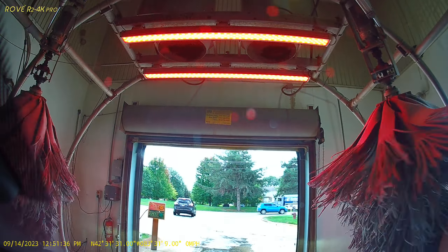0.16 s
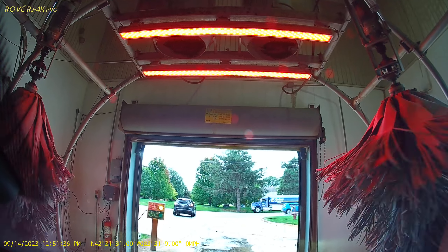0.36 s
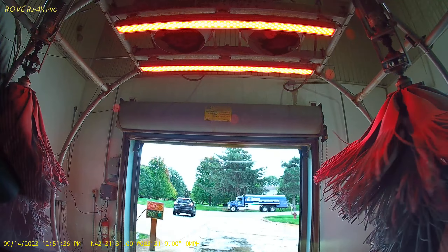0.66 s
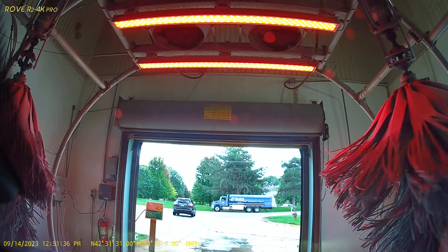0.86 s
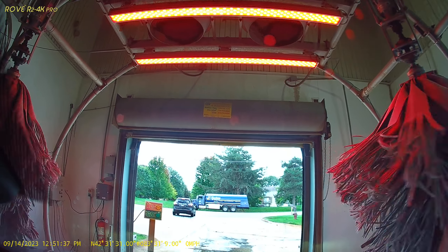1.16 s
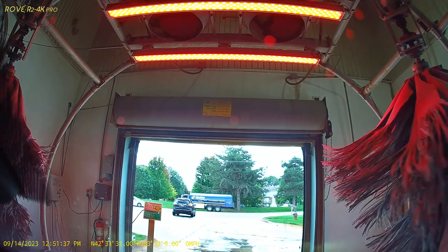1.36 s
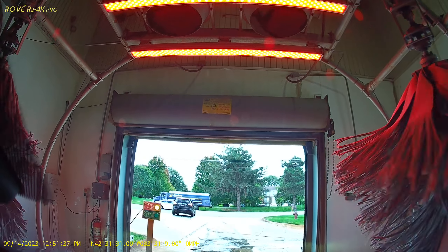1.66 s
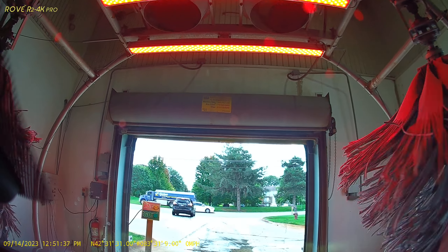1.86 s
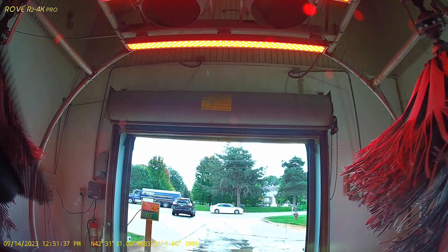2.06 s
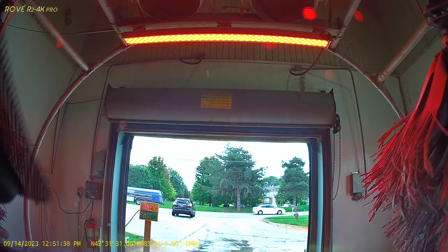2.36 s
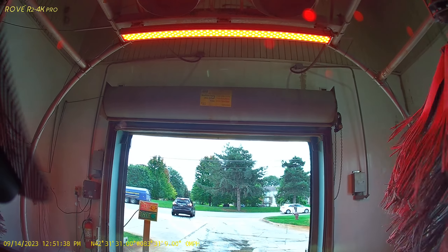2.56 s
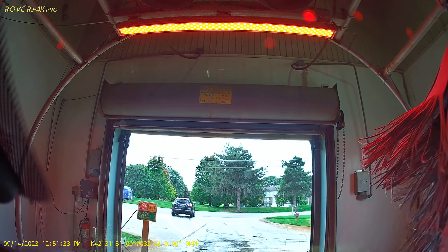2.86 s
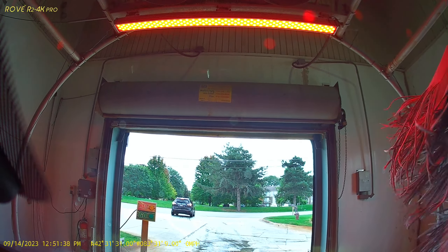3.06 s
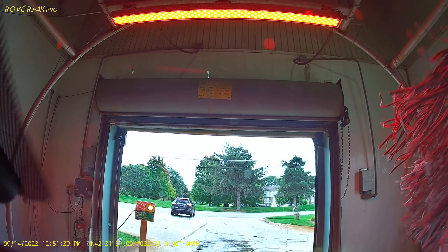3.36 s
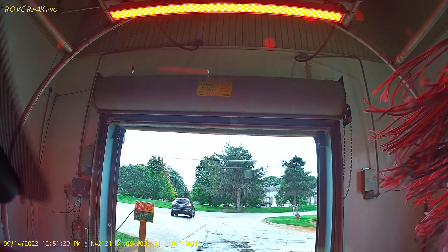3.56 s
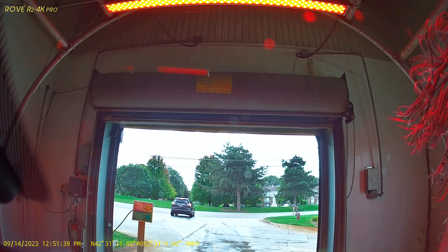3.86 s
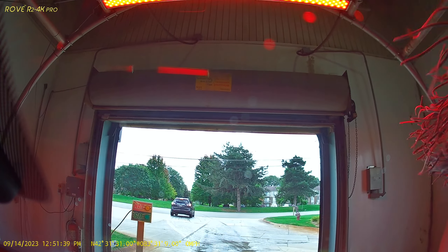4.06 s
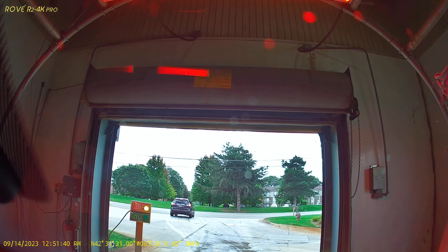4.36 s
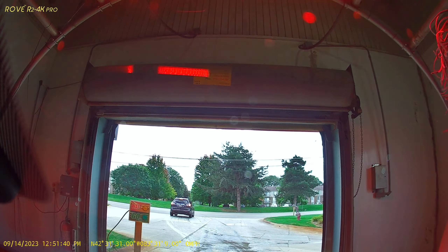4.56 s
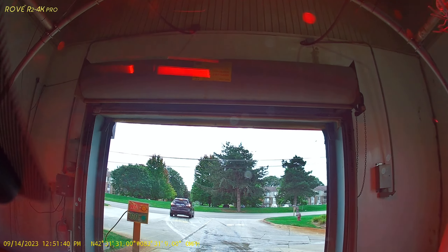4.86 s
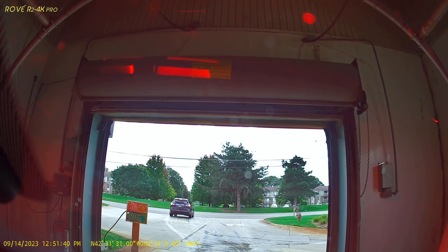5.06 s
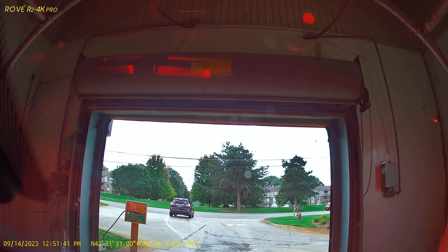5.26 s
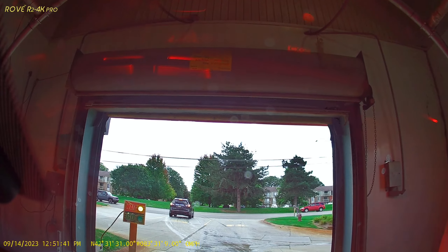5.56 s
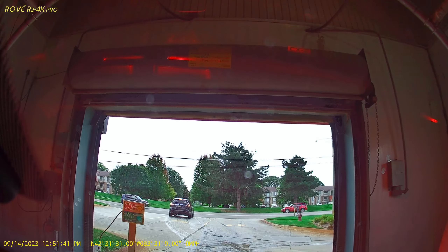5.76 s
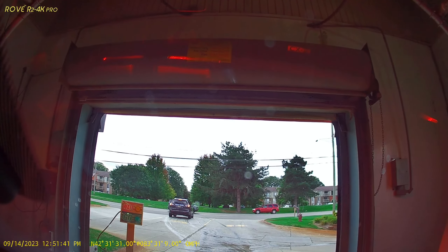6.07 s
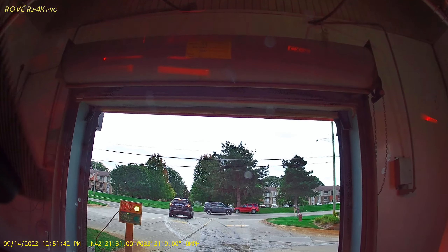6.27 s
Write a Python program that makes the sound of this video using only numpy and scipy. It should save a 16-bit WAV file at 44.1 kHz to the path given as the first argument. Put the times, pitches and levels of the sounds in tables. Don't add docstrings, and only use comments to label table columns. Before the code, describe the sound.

Inside a slowly creeping car, powerful blowers roar overhead with low fluttering rumble, faint motor hum and dull rushing air, without pause.

```python
import sys
import numpy as np
from scipy import signal
from scipy.fft import rfft, irfft, next_fast_len
from scipy.io import wavfile
from scipy.ndimage import uniform_filter1d

SR = 44100
rng = np.random.default_rng(int(sys.argv[2]) if len(sys.argv) > 2 else 0)


def attenuation_scalar(level_db):
    decades = np.asarray(level_db, float) / 20
    return 10 ** decades


def materialize(psi):
    bounded = np.clip(np.atleast_2d(psi).T, -1, 1)
    quanta = np.round(bounded * 32767).astype(np.int16)
    wavfile.write(sys.argv[1], SR, quanta)


N = 282924
CAMERA_HZ = 16000


def noise():
    return rng.standard_normal(N)


def unit(x):
    return x / np.sqrt(np.mean(x ** 2))


def shape(x, gain):
    pad = 4096
    x = np.pad(x, pad, mode="reflect")
    size = next_fast_len(len(x))
    hz = np.arange(size // 2 + 1) * SR / size + 1e-3
    return irfft(rfft(x, size) * gain(hz), size)[pad:pad + N]


def ring(modes, steep):
    def gain(hz):
        power = 0
        for mode_hz, width_hz, db in modes:
            detune = np.abs((hz - mode_hz * mode_hz / hz) / width_hz)
            power = power + attenuation_scalar(2 * db) / (1 + detune ** steep)
        return np.sqrt(power)
    return unit(shape(noise(), gain))


def even(x, hold_s, share):
    k = int(hold_s * SR)
    power = uniform_filter1d(uniform_filter1d(x ** 2, k), k)
    return unit(x / (power + 1e-3) ** (np.clip(share, 0, 1) / 2))


def walk(rate_hz):
    k = int(SR / rate_hz)
    steps = np.repeat(rng.standard_normal(N // k + 1), k)
    return 1.47 * uniform_filter1d(uniform_filter1d(steps, k), k)[:N]


def played(table):
    s, *columns = np.transpose(table)
    return [np.interp(np.arange(N) / SR, s, c) for c in columns]


def swells(s, db, length_s, fall=0.92):
    t = np.arange(0, N + 64, 64) / SR
    late = (t[:, None] - s) / length_s
    bells = np.exp(-np.where(late > 0, late / fall, late) ** 2)
    return np.interp(np.arange(N) / SR, t, bells @ db)


# (time [s], flow [dB], brightness [dB])
AIRFLOW = [(0, -1, -9.5), (.1, -0.5, -6.5), (.3, -3, -2.5), (.6, -1, 0.5), (1.0, 0, 0), (1.4, -2, 1.5),
           (1.8, -2, -1), (2.0, 0, -1), (2.5, -0.5, 0), (3.2, 0, -0.5), (3.35, -1.5, -1), (3.7, -2, 1),
           (4.1, 3, 0.5), (4.35, 1.5, -1), (4.6, 2.5, 2), (4.9, .5, 1), (5.7, 0.5, 0), (6.42, 0, 0.5)]


def airflow():
    return played(AIRFLOW)


# (time [s], level [dB], extra on windscreen [dB], length [s])
JET_GUSTS = [(0.031, 3.5, 5, 0.034), (0.341, -0.5, 5.5, 0.036), (0.517, 0, -9.5, .04), (0.827, -2, 1, .05),
             (1.203, 1, 5, .04), (1.474, 0, 1.5, .04), (1.57, -3.5, 1.5, .04), (1.635, 0.5, 4.5, 0.024),
             (1.756, -3, 3.5, 0.061), (1.898, 1.5, 1.5, 0.044), (2.179, 4.5, 1, .03),
             (2.72, 2.5, -1.5, .03), (2.977, 2.5, 1, 0.046), (3.216, 3.5, -4, .07), (3.315, -4, 1.5, .06),
             (3.546, 2.5, 1, 0.048), (3.633, -3, 3.5, 0.046), (3.795, 2.5, 4, .05), (4.165, 3.5, 1, .07),
             (4.268, -1, -2.5, .03), (4.726, 2.5, 3, 0.093), (5.078, 3.5, -1, .03), (5.596, 0, 4.5, .04),
             (5.432, 3, -5.5, 0.036), (5.523, -2.5, 3, .03), (5.722, -2.5, 4, .05), (5.796, 4, -2.5, 0.027),
             (5.915, 3, 0, .05), (6.013, -3.5, 1.5, 0.029), (6.206, 1.5, 2, .05)]


def gusts():
    s, db, strike_db, length_s = np.transpose(JET_GUSTS)
    return swells(s, db, length_s, fall=.7), swells(s, strike_db, length_s)


# (frequency [Hz], width [Hz], level [dB])
CABIN_MODES = [(31.4, 14, -3), (47.6, 16.7, -1)]
# (time [s], level re steady boom [dB], length [s])
PRESSURE_BUFFETS = [(0.337, -4, .04), (0.581, 4.5, 0.11), (0.964, 5, 0.12), (1.229, 5, .05),
                    (1.132, -3, .04), (1.483, 8, 0.054), (1.674, 7, 0.04), (1.95, -2, .12), (2.138, 5, .04),
                    (2.192, -7.5, 0.047), (2.233, 9.5, 0.032), (2.412, 4, 0.032), (.06, 3, 0.051),
                    (2.801, 2, 0.028), (2.93, -4.5, 0.064), (3.008, 5.5, 0.039), (3.243, 8, 0.055),
                    (4.4, -2, .12), (3.57, 3.5, 0.052), (3.724, -7, 0.046), (3.875, 2.5, 0.087),
                    (4.038, -14, 0.036), (4.18, 6.5, 0.11), (4.81, 5, .06), (5.318, 3, .04),
                    (5.47, -2.5, 0.066), (5.557, 5, .05), (6.05, 6.5, .07), (6.284, 4.5, .05),
                    (6.402, 9, .04)]


def cabin_boom():
    level_db = -33.5 + swells(*np.transpose(PRESSURE_BUFFETS))
    return attenuation_scalar(level_db) * even(ring(CABIN_MODES, steep=3.42), hold_s=.05, share=0.83)


# (frequency [Hz], width [Hz], level [dB])
ROOF_MODES = [(110.9, 32.6, -1.5), (134.5, 27, -3.5), (170, 44.4, -8)]
# (time [s], level re steady drumming [dB])
ROOF_EDDIES = [(.24, 3), (.37, 4), (.62, -2), (.75, 3), (.89, -7.5), (1.46, 5), (1.6, -3), (1.71, -3),
               (2.0, 5), (2.3, -1.5), (2.45, 4.5), (2.78, -3.5), (2.85, 7), (3.03, 7), (3.5, -2),
               (4.03, -4), (4.11, 2.5), (4.18, -1), (4.25, 5), (4.42, 5.5), (4.72, 4.5), (5.04, -5.5),
               (5.18, 3), (5.31, 6.5), (5.361, -4.5), (5.49, -4), (5.64, 4), (5.73, -3.5), (6.25, 5),
               (6.4, -8)]


def roof_drumming():
    eddy_s = .045
    level_db = -38 + swells(*np.transpose(ROOF_EDDIES), eddy_s)
    return attenuation_scalar(level_db) * even(ring(ROOF_MODES, steep=2.78), hold_s=0.068, share=1.0)


# (frequency [Hz], width [Hz], level [dB])
PANEL_MODES = [(231.5, 40, 0.5), (385, 103, -5), (485.7, 49, -8.5), (607, 73, -16), (665, 28, -16.5)]


def panel_roar(roar_db):
    return attenuation_scalar(roar_db) * even(ring(PANEL_MODES, steep=2.91), hold_s=0.071, share=0.94)


# (frequency [Hz], width [Hz], level [dB])
SCREEN_MODES = [(711.6, 58, 0), (752, 58, -2.5)]


def windscreen(screen_db):
    return attenuation_scalar(screen_db - 1.0) * even(ring(SCREEN_MODES, steep=2.56), hold_s=0.076, share=.6)


# (multiple of shaft rate [1], level re roar, or from 10 up re windscreen + 7 dB [dB])
BLADE_TONES = [(4, -18), (8, -12), (11, -23), (12, -11), (16, -31)]


def blades(roar_db, screen_db):
    shaft_hz = 58.83
    turn = 2 * np.pi * shaft_hz * np.arange(N) / SR
    tones = 0
    for multiple, db in BLADE_TONES:
        path_db = roar_db if multiple < 10 else screen_db + 7
        shake_rad = 1.45 * walk(14)
        level_db = path_db + db + 1.5 * walk(12)
        tones = tones + attenuation_scalar(level_db) * np.sin(multiple * turn + shake_rad)
    return tones


# (frequency [Hz], density [dB/Hz])
HISS_SPECTRUM = [(500, -35), (850, -4), (1060, 1.5), (1140, -1), (2090, -12), (2270, -13.5), (4760, -22),
                 (5880, -24), (7600, -28.5), (9880, -67.5), (16700, -120)]


def hiss(rush_db, bright_db, eddies_db):
    table_hz, table_db = np.transpose(HISS_SPECTRUM)
    out = 0
    for mid_hz in 850 * 2 ** np.arange(0, 3.6, .5):
        def gain(hz):
            overlap = np.cos(np.pi * np.clip(np.log2(hz / mid_hz), -.5, .5))
            return overlap * attenuation_scalar(np.interp(np.log(hz), np.log(table_hz), table_db))
        high = np.clip(np.log2(mid_hz / 1500), 0, 1)
        flicker_db = 1.0 * walk(12)
        band_db = high * (bright_db - bright_db.mean()) + (0.68 + 0.097 * high) * eddies_db + flicker_db
        out = out + attenuation_scalar(band_db) * shape(noise(), gain)
    return attenuation_scalar(rush_db + 3.5) * unit(out)


# (frequency [Hz], width [Hz], level [dB])
DASH_MODES = [(1045, 58, -3), (1400, 58, -13.5), (1643, 76, -12.5), (2080, 88, -16), (2880, 180, -25),
              (4350, 130, -28.5), (5870, 220, -29.5)]


def dash_hollows(rush_db, eddies_db):
    return attenuation_scalar(rush_db + eddies_db - 4.5) * ring(DASH_MODES, steep=3.3)


def body_sway():
    return attenuation_scalar(-47) * ring([(5, 9, 0)], steep=3.0)


# (frequency [Hz], width [Hz], level [dB])
GAP_MODES = [(3850, 90, 0), (3980, 120, -1), (4420, 90, -3)]
# (time [s], level [dB])
WHISTLE_LEVEL = [
    (0, -92),
    (.35, -83),
    (.6, -75),
    (1.25, -75),
    (1.5, -81),
    (2.5, -84),
    (4, -86),
    (6.42, -86),
]


def seal_whistle():
    level_db, = played(WHISTLE_LEVEL)
    return attenuation_scalar(level_db) * ring(GAP_MODES, steep=5.7)


def scene():
    flow_db, bright_db = airflow()
    gusts_db, strike_db = gusts()
    eddies_db = 0.73 * walk(24) + .6 * walk(60)
    roar_db = -42.5 + 0.83 * flow_db + 1.26 * gusts_db - .35 * bright_db
    screen_db = -50.5 + flow_db + gusts_db + strike_db
    rush_db = -58.5 + flow_db + 0.64 * gusts_db

    boom = cabin_boom()
    roof = roof_drumming()
    struck = panel_roar(roar_db) + windscreen(screen_db) + blades(roar_db, screen_db)
    jets = attenuation_scalar(0.8 * eddies_db) * struck
    leaks = hiss(rush_db, bright_db, eddies_db) + dash_hollows(rush_db, eddies_db) + seal_whistle()
    seals = (1 + 1.9 * boom) * leaks
    flutter = attenuation_scalar(0.55 * walk(34))
    return (boom + roof + flutter * (jets + seals) + body_sway())[None]


def patchy_top(x):
    top_hz, hold = 7800, 2822
    edges_hz = np.linspace(top_hz, CAMERA_HZ / 2, 6)
    out = shape(x, lambda hz: hz < top_hz)
    for low, high, chance in zip(edges_hz, edges_hz[1:], rng.random((5, N // hold + 1))):
        kept = np.repeat(chance > .3, hold)[:N]
        strip = shape(x, lambda hz: (hz >= low) & (hz < high))
        out = out + uniform_filter1d(1. * kept, size=900) * strip
    return out


def roll_off(x):
    return signal.sosfilt(signal.butter(12, 8830, fs=SR, output="sos"), x)


def record(dry):
    half_hz = CAMERA_HZ / 2
    bent = np.tanh(5 * dry[0]) / 5 + .35 * dry[0] ** 2
    sampled = patchy_top(bent - bent.mean())
    mirror = 2 * sampled * np.cos(2 * np.pi * CAMERA_HZ * np.arange(N) / SR)
    mirror = shape(mirror, lambda hz: (hz > half_hz) & (hz < 1.2 * half_hz))
    played_back = shape(sampled + mirror, lambda hz: 1 / (1 + attenuation_scalar((hz - 8000) / 33.0)))
    fade_out = np.sin(np.pi / 2 * np.clip(np.arange(N)[::-1] / 260, 0, 1)) ** 2
    mix = (played_back * fade_out)[None]
    return roll_off(mix)


dry = scene()
out = record(dry)
materialize(out)
```